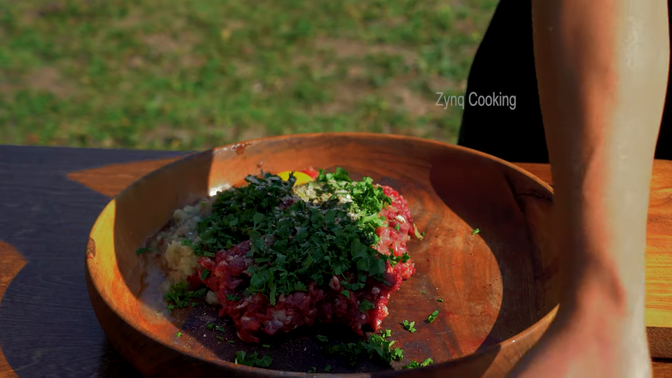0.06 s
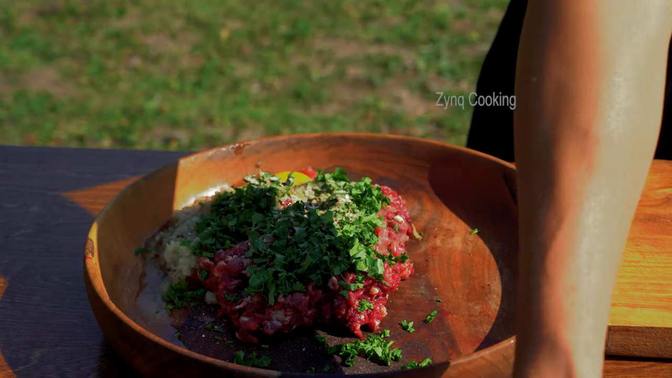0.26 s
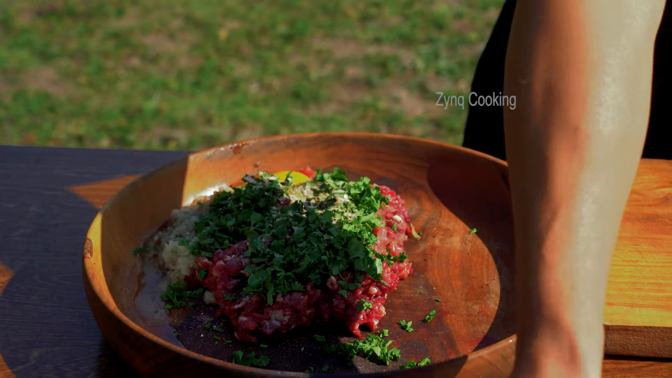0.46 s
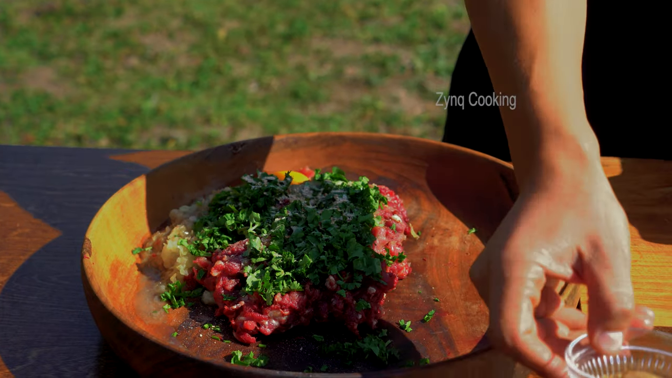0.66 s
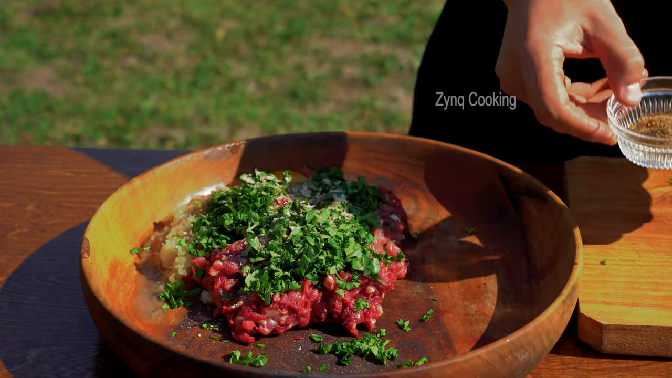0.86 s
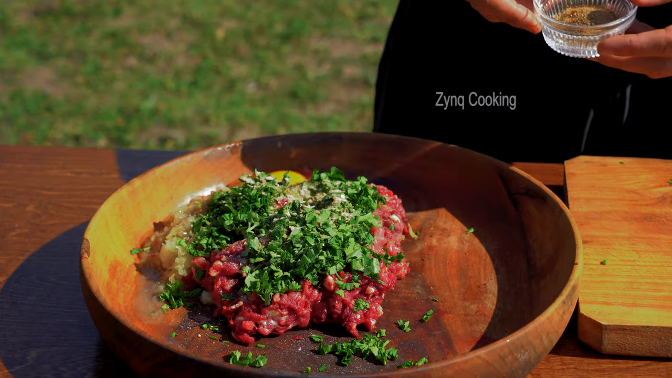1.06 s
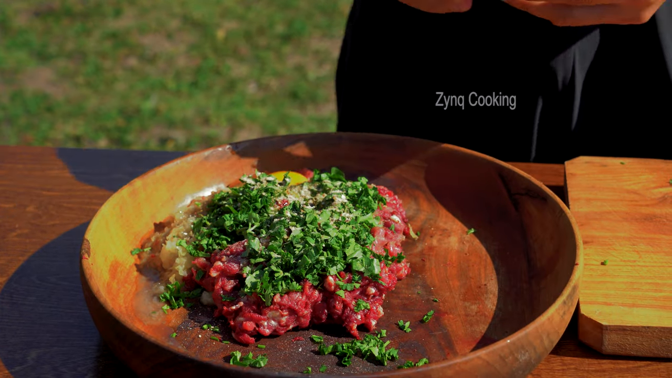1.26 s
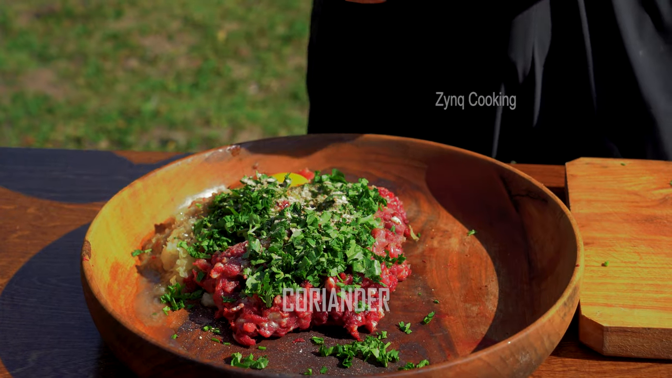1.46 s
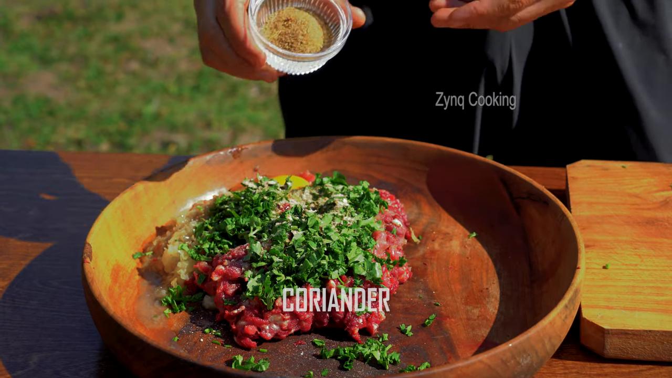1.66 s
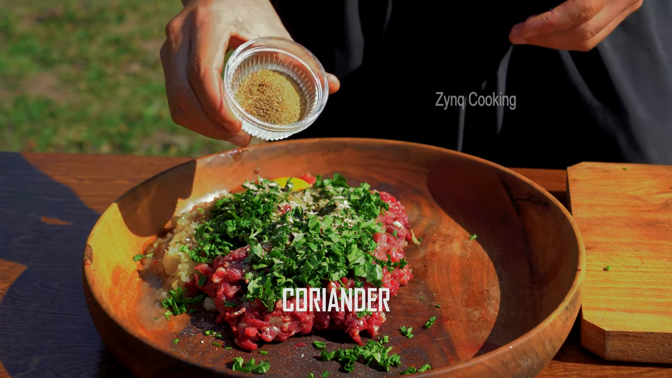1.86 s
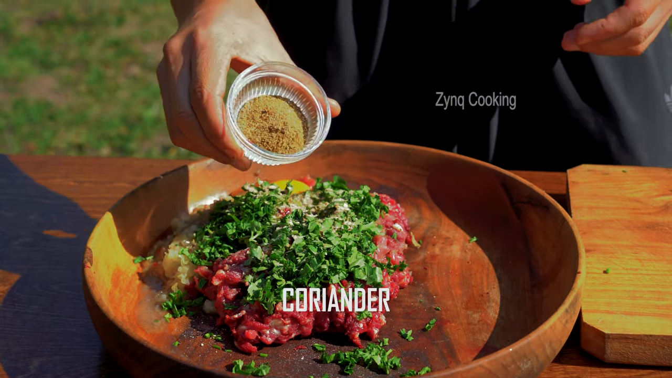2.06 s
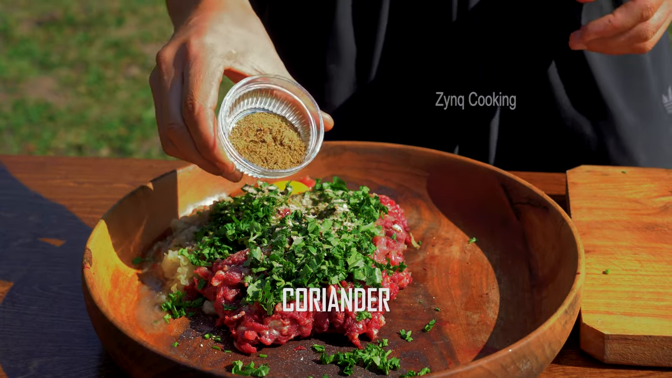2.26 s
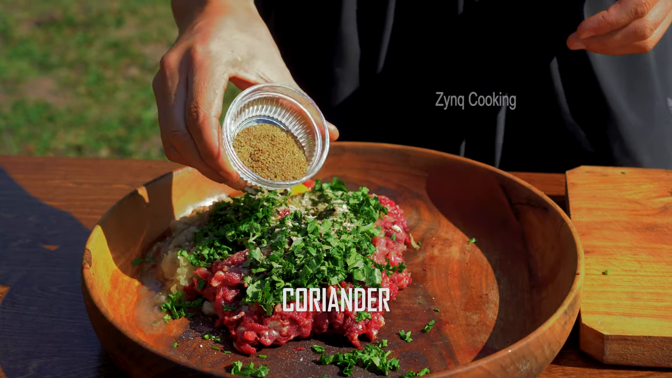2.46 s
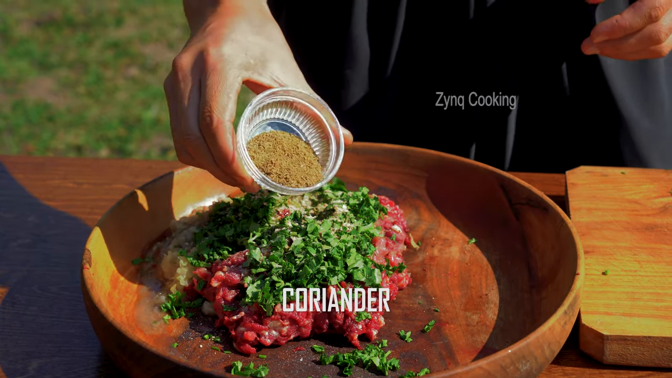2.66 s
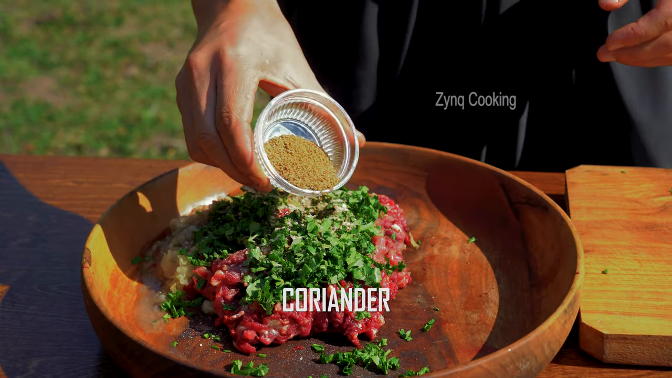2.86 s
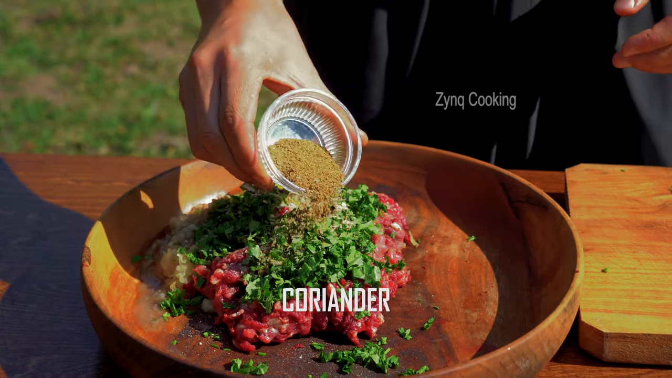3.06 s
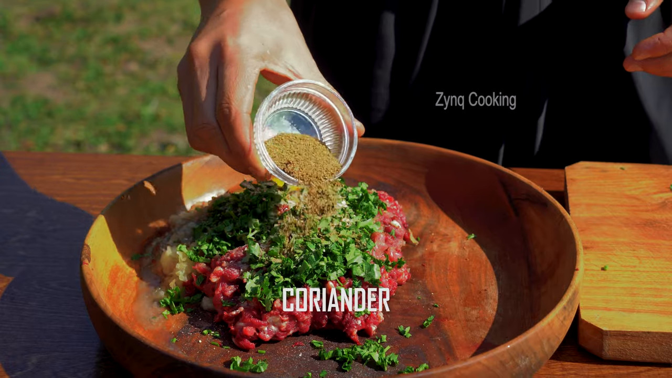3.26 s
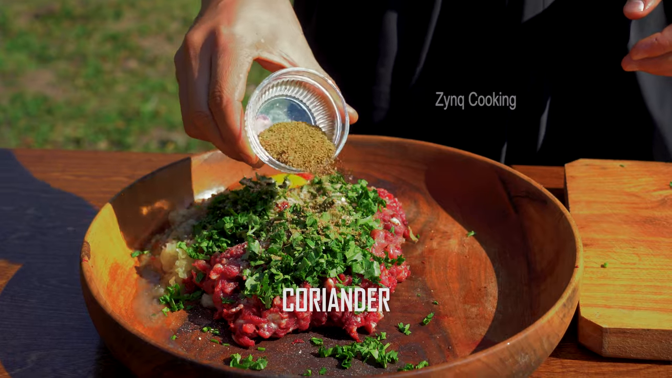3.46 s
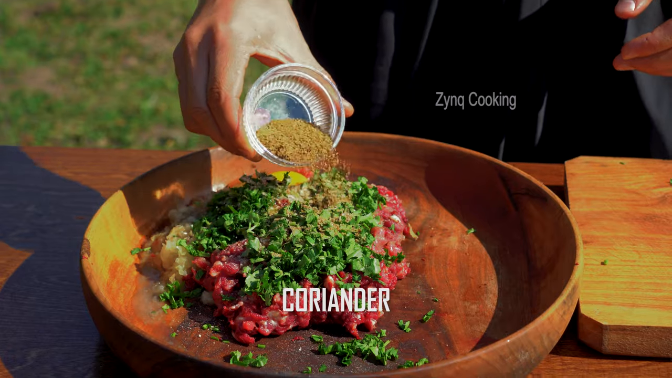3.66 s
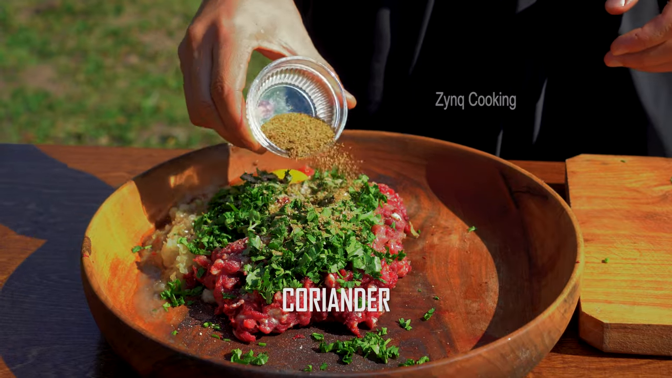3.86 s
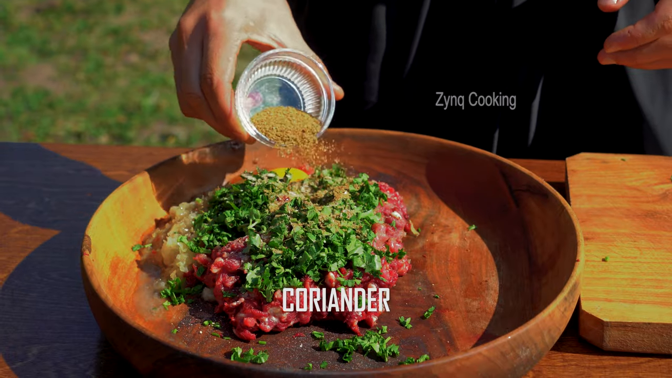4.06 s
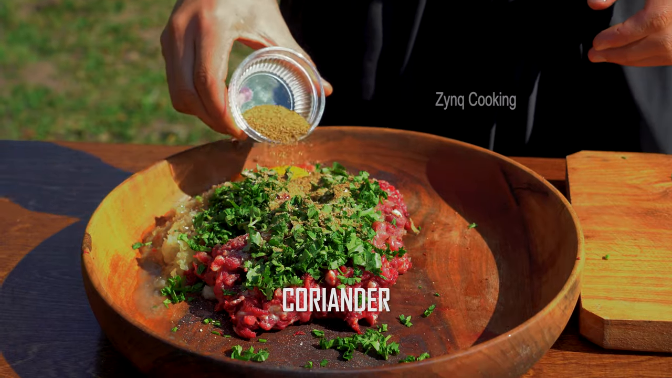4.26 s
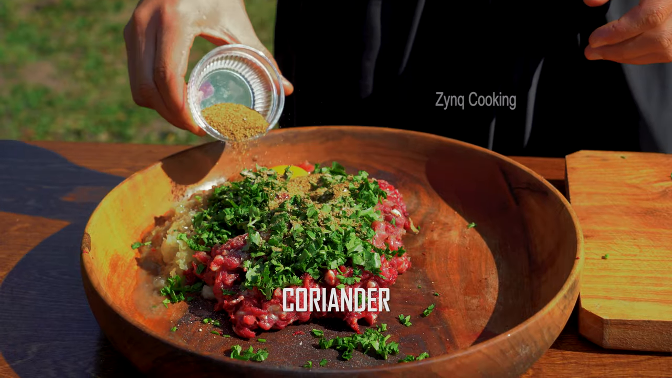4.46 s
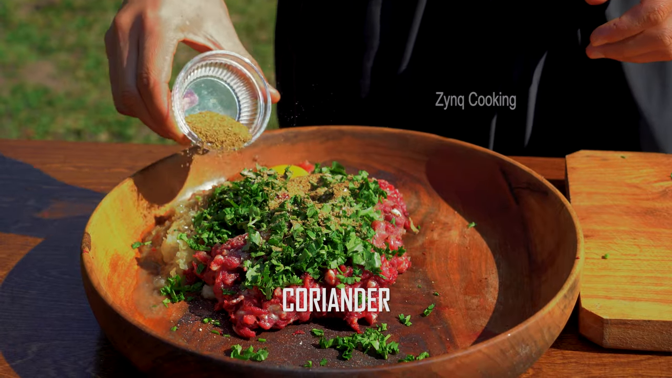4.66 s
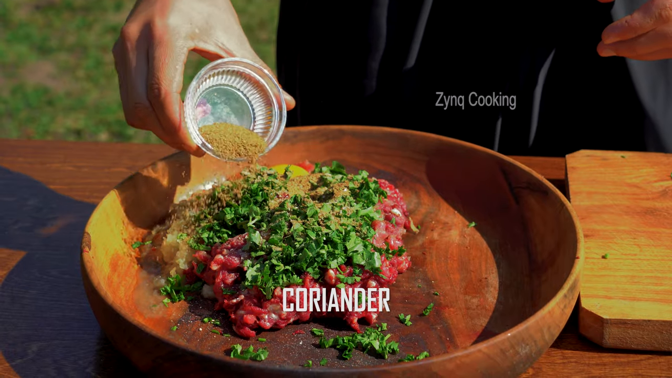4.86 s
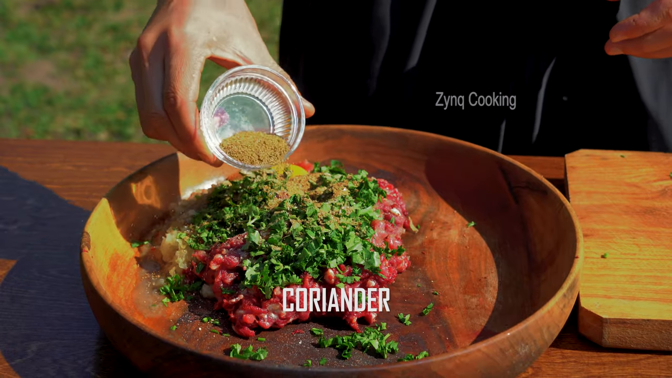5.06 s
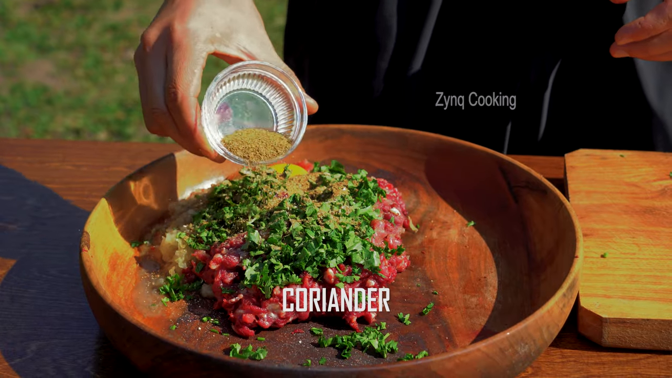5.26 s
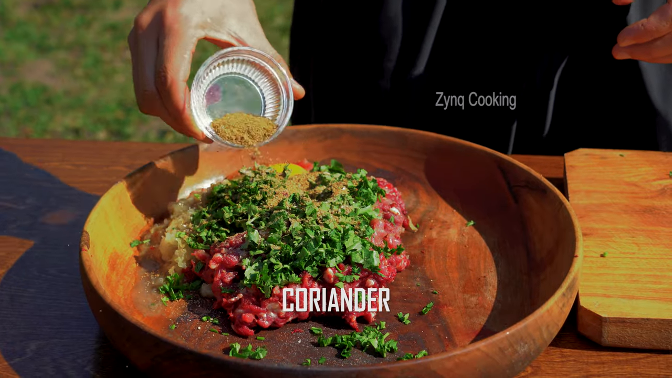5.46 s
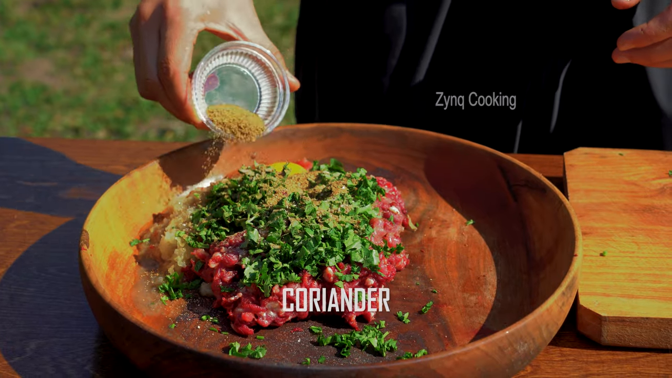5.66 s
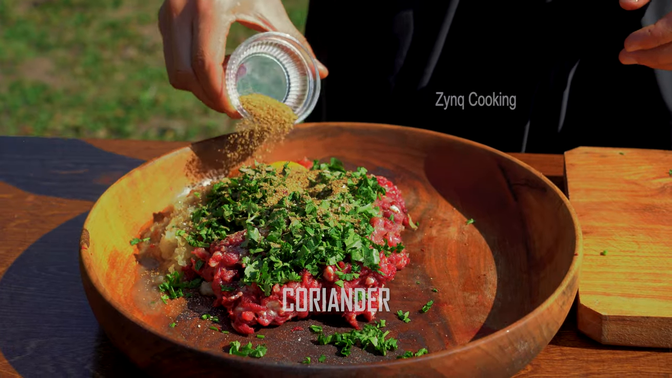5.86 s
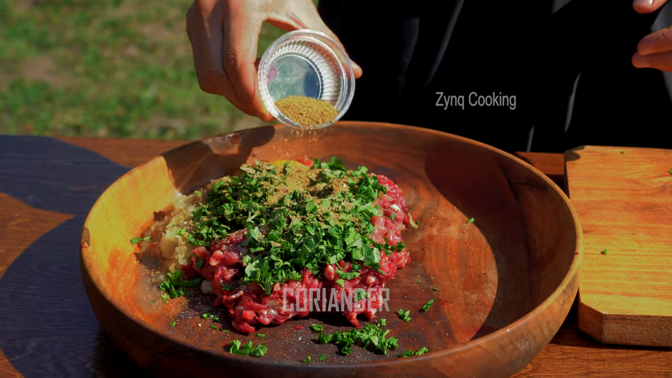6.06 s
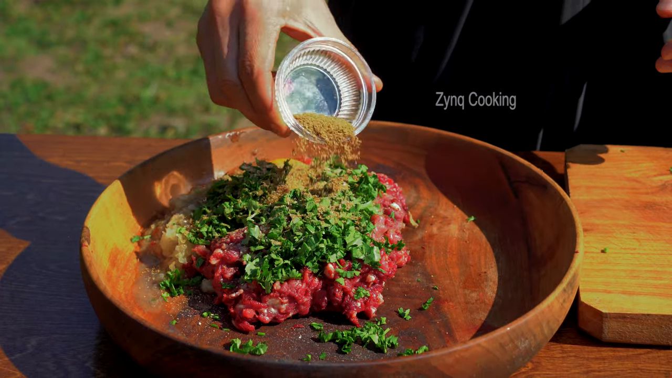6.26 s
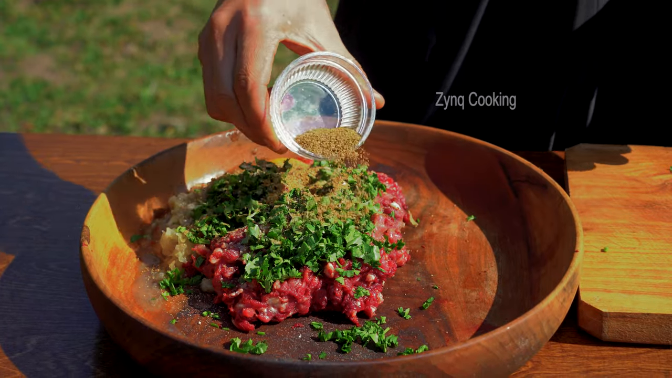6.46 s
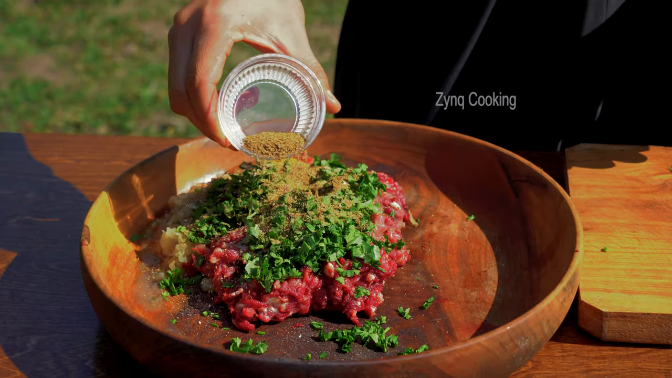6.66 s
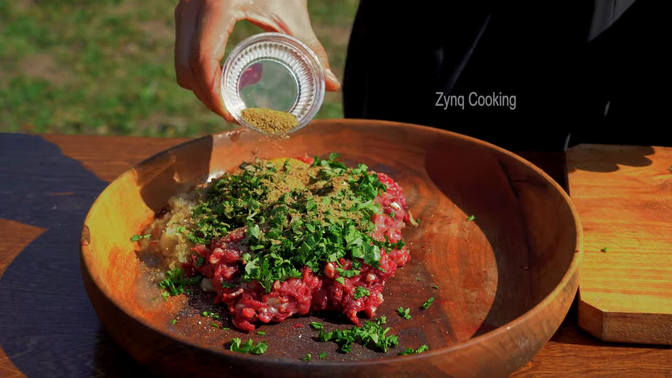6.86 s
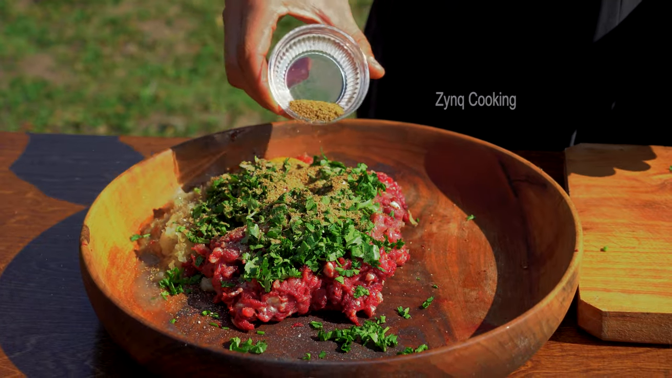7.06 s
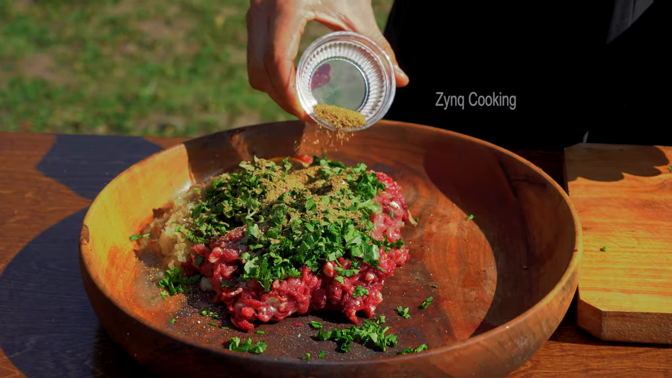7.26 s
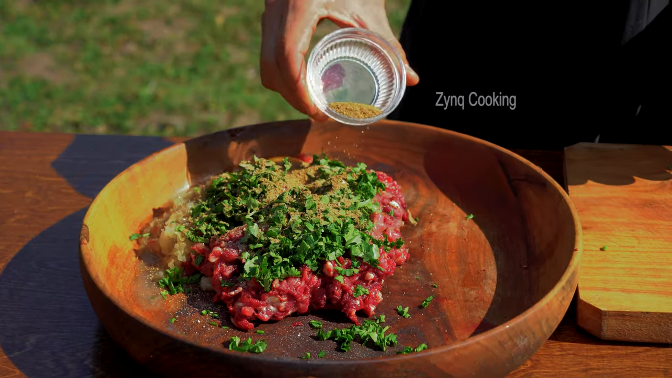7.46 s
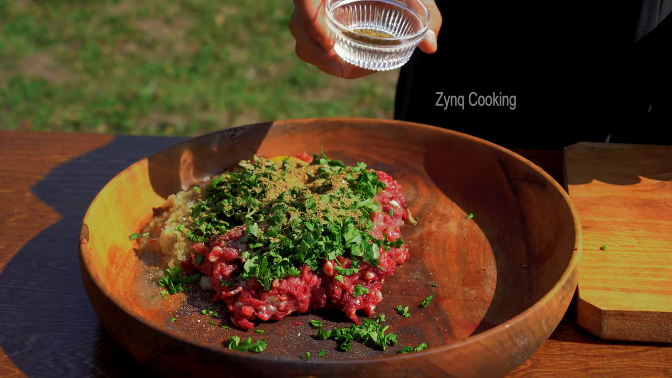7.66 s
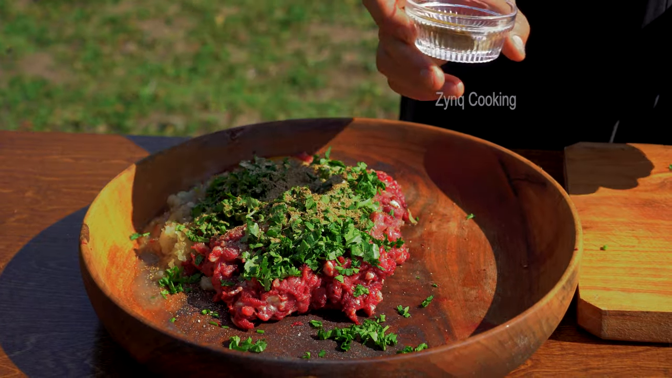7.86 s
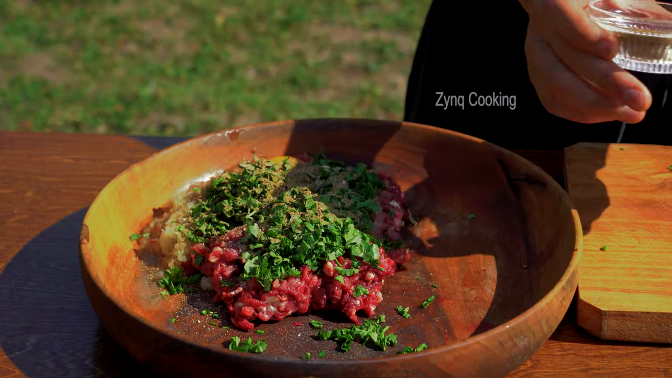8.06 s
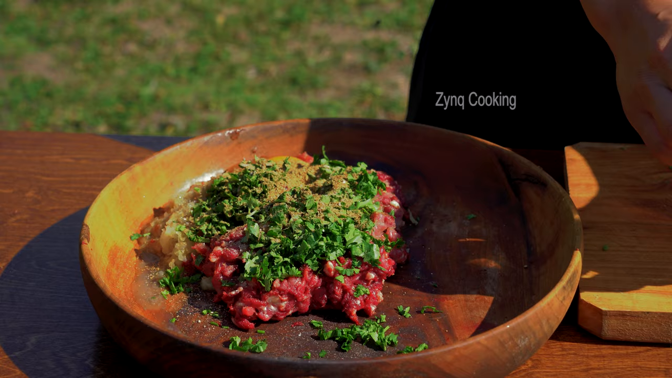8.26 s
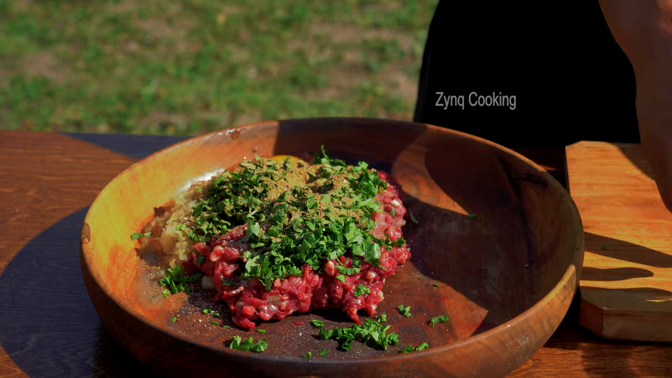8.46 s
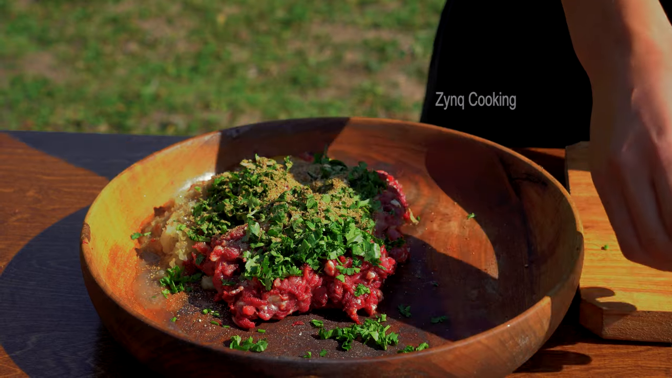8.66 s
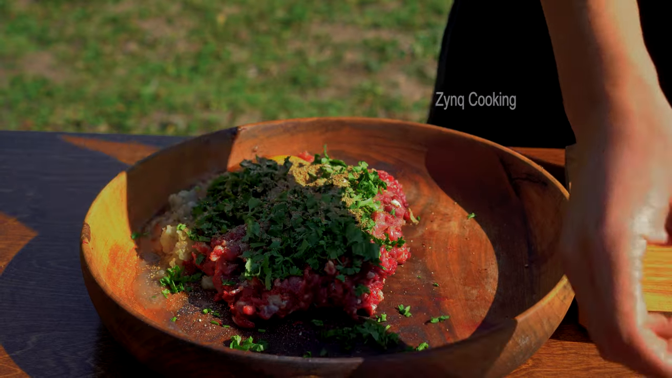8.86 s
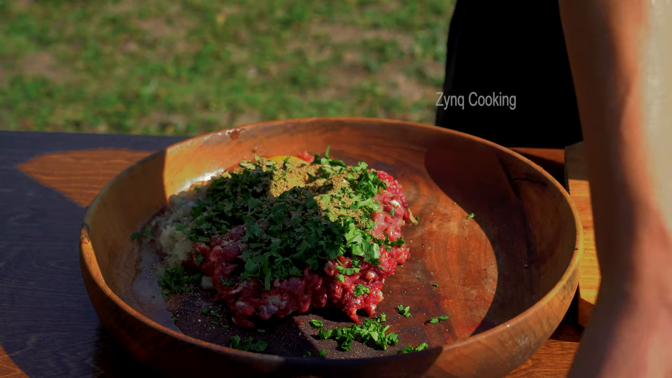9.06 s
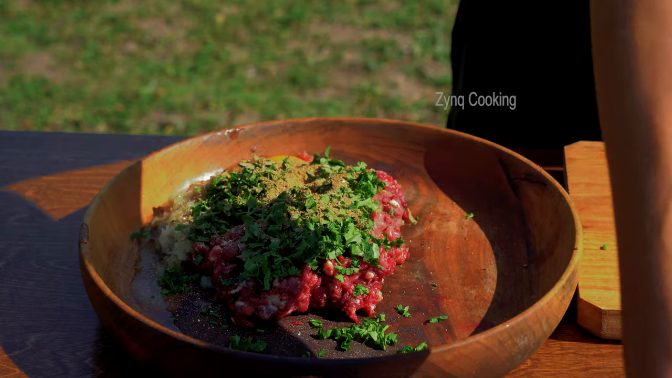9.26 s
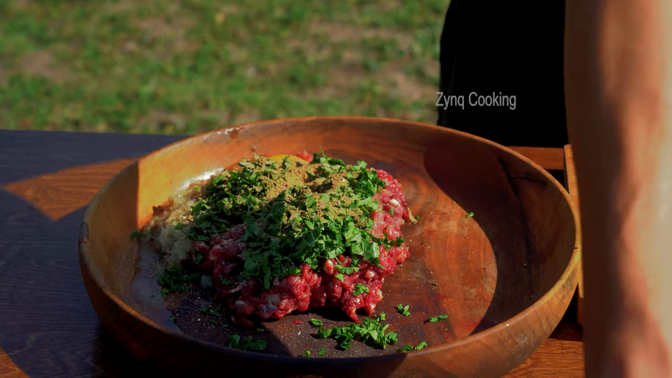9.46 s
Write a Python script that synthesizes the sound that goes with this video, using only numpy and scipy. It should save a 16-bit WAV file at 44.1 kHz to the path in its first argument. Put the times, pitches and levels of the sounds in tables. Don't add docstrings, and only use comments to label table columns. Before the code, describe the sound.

Soft open-air wash with sparse dry ticks from shaken spice, low wind buffeting, and finally a glass bowl knocked down and dragged on wooden planks.

```python
import sys
import numpy as np
from scipy import signal
from scipy.fft import rfft, irfft
from scipy.io import wavfile
from scipy.ndimage import uniform_filter1d

SR = 44100
rng = np.random.default_rng(int(sys.argv[2]) if len(sys.argv) > 2 else 0)


def makeup_ratio(level_db):
    decades = np.asarray(level_db, float) / 20
    return 10 ** decades


def dump(signal):
    limited = np.clip(np.atleast_2d(signal).T, -1, 1)
    pcm = np.round(limited * 32767).astype(np.int16)
    wavfile.write(sys.argv[1], SR, pcm)


N = 418950


def evened(x):
    return x / np.sqrt(np.mean(x ** 2) + 1e-20)


def steadied(x, size):
    power = abs(uniform_filter1d(x ** 2, size))
    return evened(x / np.sqrt(power + 0.075 * np.mean(x ** 2)))


def add(mix, s, sound):
    part = mix[round(s * SR):][:len(sound)]
    part += sound[:len(part)]


def coloured(x, points):
    point_hz, db = np.transpose(points)
    hz = np.fft.rfftfreq(x.shape[-1], 1 / SR)
    gain = makeup_ratio(np.interp(np.log(hz + 1), np.log(point_hz + 1), db))
    return evened(irfft(rfft(x) * gain, x.shape[-1]))


def band(x, lo_hz, hi_hz, order=2):
    sos = signal.butter(order, [lo_hz, min(hi_hz, .49 * SR)], "band", fs=SR, output="sos")
    return signal.sosfilt(sos, x)


def notch(x, hz, width_hz):
    return signal.lfilter(*signal.iirnotch(hz, hz / width_hz, SR), x)


def ring(modes, t, tilt_db=0, phases=0):
    hz, db, t60 = np.transpose(modes)[:, :, None]
    db = db + tilt_db * np.log2(np.maximum(hz / 1000, 1))
    return (makeup_ratio(db - 60 * t / t60) * np.sin(2 * np.pi * hz * t + phases)).sum(0)


# frequency in Hz, density in dB per Hz.
WASH_COLOUR = [(7, -23.5), (12, 12), (22, -5), (37, -6.5), (70, -12), (110, -8.5), (300, -11), (600, -11.5),
               (1100, -12), (2100, -19.5), (3400, -25), (4500, -33), (7000, -48), (16000, -55.5)]
# time in seconds, level in dB.
WASH_SWELL = [(0.0, -1.5), (9.5, -1)]
WASH_DB, PATCHY_DB = -54.5, .6


def wash():
    frames = N // 256 + 5
    a, b, patches = rng.standard_normal((frames, 513, 3)).T
    patches = uniform_filter1d(uniform_filter1d(patches, 12, 0), 14, 1)
    spectrum = (a + 1j * b) * makeup_ratio(PATCHY_DB * evened(patches))
    noise = signal.istft(spectrum, nperseg=1024, noverlap=768)[1][:N]
    swell_db = np.interp(np.arange(N) / SR, *np.transpose(WASH_SWELL))
    return makeup_ratio(WASH_DB + swell_db) * coloured(noise, WASH_COLOUR)


# frequency in Hz, level in dB, t60 in seconds.
TABLE_MODES = [(172.5, -1.5, 0.23), (250, -9, 0.27), (375.8, -6, 0.22), (436, 0, 0.11), (483, -6.5, 0.13),
               (619, 0, 0.045), (707, 3, 0.033), (811, -2.5, 0.075), (936, 4, 0.029), (1102, 0, 0.031),
               (1246, -13.5, 0.022), (1603, 4, 0.016), (1890, 1.5, 0.041), (2000, -4, 0.026),
               (2230, 5, 0.017), (2620, 8, 0.0091), (3230, 7, .02), (4430, -30, 0.0197)]
# frequency in Hz, density in dB per Hz.
PLANK_GRAIN = [(90, -40), (170, 11.5), (420, 9.5), (1000, -2), (1400, -9), (2500, -33), (5000, -37),
               (9000, -62), (16000, -90)]


def wood(t, draws, tilt_db, grain_db):
    share, noise = draws[:len(TABLE_MODES)], draws[-len(t):]
    modes = [(hz, db + 3.1 * abs(k), t60) for (hz, db, t60), k in zip(TABLE_MODES, share)]
    build_up = 1 - np.exp(-t / 0.0038)
    grain = coloured(noise, PLANK_GRAIN) * makeup_ratio(grain_db - 60 * t / 0.094) * build_up
    return ring(modes, t, tilt_db=tilt_db) + grain


# start in seconds, blow in dB, contact in ms,
# grit in dB re the blow, lowest frequency stirred in Hz.
FOOT_KNOCKS = [
    (0.394, -35.5, 0.83, -40, 90),
    (0.4645, -33.5, 1.73, -40, 300),
    (8.805, -8, 0.7, -6.5, 520),
    (8.821, -33, 0.24, 9.5, 300),
    (8.831, -29, 1.1, -29.5, 300),
    (8.836, -32, 0.9, 3, 300),
    (8.857, -5, 1, -21, 120),
    (8.875, -18.5, 1.14, -17, 120),
]


def knocks():
    out, t = np.zeros(N), np.arange(SR // 4) / SR
    draws = rng.standard_normal((len(FOOT_KNOCKS), len(t) + 100))
    for (s, db, ms, grit_db, low_hz), each in zip(FOOT_KNOCKS, draws):
        push = np.diff(signal.windows.hann(int(ms * SR / 1000) + 3))
        answer = np.convolve(wood(t, each, -1.1, 8.5), push)[:len(t)]
        thud = band(answer, low_hz, 12000, order=1)
        grit = band(each[:len(t)], 1680, 3900) * makeup_ratio(grit_db - 60 * t / 0.0236)
        add(out, s, makeup_ratio(db) * (thud / abs(thud).max() + grit))
    return out


# time of the top in seconds, level in dB, rise in seconds,
# brightness in dB, lowest frequency in Hz.
FOOT_DRAGS = [
    (.445, -42.5, .012, -12, 302),
    (.468, -39, 0.0094, -19, 318),
    (0.623, -51, .0015, -25, 200),
    (8.955, -39.5, 0.0092, -26, 250),
    (8.971, -19.5, 0.0059, -2, 150),
    (9.007, -18, 0.0033, -10, 342),
    (9.035, -25.5, .005, -22, 340),
    (9.044, -33.5, .003, -25, 327),
    (9.083, -58, .01, -14, 200),
]
LET_GO_T60 = 0.029


def drags():
    out, t = np.zeros(N), np.arange(SR // 5) / SR
    draws = rng.standard_normal((len(FOOT_DRAGS), 3, len(t)))
    for (s, db, rise, bright_db, low_hz), (a, b, c) in zip(FOOT_DRAGS, draws):
        after = t - 3 * rise
        stroke = np.where(after < 0, np.exp(-(after / rise) ** 2), makeup_ratio(-60 * after / LET_GO_T60))
        slips = band(a * (abs(b) > 1.5) * stroke, low_hz, 3900)
        answer = wood(t, c, bright_db - 9.0, 4.5) * makeup_ratio(-120 * t)
        rub = signal.fftconvolve(slips, answer)[:len(t)]
        rub = notch(band(rub, 0.87 * low_hz, 9000), 570, 160)
        add(out, s - 3 * rise, makeup_ratio(db) * 1.65 * rub / abs(rub).max())
    return out


# low edge in Hz, high edge in Hz, level in dB, sign so that neighbours add.
CRACK_BANDS = [(1600, 3600, 4, -1), (4500, 6000, 0, 1), (6700, 9200, 3.5, -1), (10000, 14800, 11, 1)]
# frequency in Hz, width in Hz.
CRACK_DIPS = [(4000, 200), (9700, 700)]


def tick(db, body_db, edge_db, air_db, echo_db, noise):
    t = np.arange(len(noise)) / SR
    click = (t == 0) + .12 * noise * makeup_ratio(-60 * t / .003)
    crack = np.zeros(len(t))
    for share_db, (lo, hi, lift_db, sign) in zip((body_db, 0, edge_db, air_db), CRACK_BANDS):
        rung = band(click, lo, hi)
        crack += sign * makeup_ratio(share_db + lift_db) * rung / abs(rung).max()
    for hz, width_hz in CRACK_DIPS:
        crack = notch(crack, hz, width_hz)
    crack += makeup_ratio(body_db - 8.5) * ring([(525, 0.036, 0.0037), (960, 0.013, 0.0049)], t)
    scatter = noise[::-1] * (t > .0012) * makeup_ratio(-22 - 60 * np.maximum(t - .0065, 0) / .014)
    scatter[round(.0042 * SR)] += 1
    echo = signal.fftconvolve(crack, scatter)[:len(t)]
    return makeup_ratio(db) * (crack + makeup_ratio(echo_db) * echo)


# time in seconds, peak in dB at 3.5-6.5 kHz, then in dB re that peak
# the body at 1-3.5 kHz, edge at 6.5-10 kHz and air at 10-15 kHz.
DRY_TICKS = [(0.4616, -44.5, 3.5, -1, -17), (0.62, -42.5, 3.5, 1, -9), (1.2133, -58.5, -1, 3, 0),
             (1.6359, -35.5, -8, 3, -6), (1.6533, -38, -9, -9, -7), (2.2644, -59.5, -5, 0, -3),
             (2.6616, -25.5, 1.5, -9, -16), (2.9016, -44.5, -23, -34, -31), (2.99, -34, -4, -8, -16),
             (3.099, -47, -5, -1, -18), (3.212, -30, 5, 2.5, -9), (3.312, -22, -2.5, -2, -12),
             (3.7145, -43.5, -15, -14, -25), (4.0885, -55, 8.5, -8, -14), (5.4592, -50.5, 4, -1, -7),
             (5.5533, -43.5, 2, -2, -14), (5.676, -44, -26, -3, -25), (6.336, -57.5, 8, 8, 0),
             (6.382, -34.5, -3, 5.5, -11), (6.8007, -32.5, -11.5, -6, -9), (7.1906, -55, -11, -21, -22),
             (8.1706, -60, 12, 13, 0), (8.934, -27.5, -3.5, -0.5, -4), (8.9602, -39, -1, 4, -9)]
# time in seconds, peak in dB.
MORE_TICKS = [(3.3784, -58), (3.3976, -58), (3.5484, -64), (3.7505, -54), (4.1214, -64), (4.7864, -65),
              (4.8217, -61), (5.0015, -65), (5.0434, -63), (5.2574, -62), (5.3926, -62), (5.7486, -60),
              (5.9124, -64), (5.9224, -62), (8.2362, -58)]
# body, edge and air in dB re the peak.
SPECK_COLOUR = (-1, -5, -14)
ECHO_DB = -16.5


def ticks():
    rows = list(DRY_TICKS) + [(*row, *SPECK_COLOUR) for row in MORE_TICKS]
    out, noise = np.zeros(N), rng.standard_normal((len(rows), 1400))
    for (s, *row), each in zip(rows, noise):
        add(out, s + 0.00133, tick(*row, ECHO_DB, each))
    return out


# time when full in seconds, hold in seconds, level in dB,
# sharpness of the edges in dB re the eddies.
GUST_EDDIES = [(4.858, 0.047, -48.5, -11.5), (5.056, 0.067, -52, -15), (5.154, .015, -36.5, -9),
               (5.308, .08, -59.5, -5.5), (5.52, .03, -57.5, -10), (5.716, .02, -57, -19),
               (6.17, 0.045, -52, -14), (6.523, 0.13, -58, -16), (6.867, 0.008, -39.5, -23),
               (7.178, 0.015, -40.5, -17), (7.26, .12, -55, -10), (7.57, 0.063, -37, -9.5),
               (7.676, .12, -44.5, -17), (8.173, .04, -39.5, -13), (8.232, 0.15, -35.5, -5),
               (8.412, 0.065, -30, -8.5), (8.526, 0.037, -31, -8), (8.636, 0.06, -45, -12),
               (8.802, 0.0087, -35, -25), (8.884, 0.047, -38, -22), (9.003, 0.07, -53, 2.5),
               (9.31, .06, -57, -10), (9.425, 0.033, -31.5, -13.5)]
GUST_RISE_DB_PER_S, GUST_FALL_DB_PER_S = 500., 303.5


def gusts(t):
    s, hold, db, sharp_db = np.transpose(GUST_EDDIES)[:, :, None]
    early, late = np.maximum(s - t, 0), np.maximum(t - s - hold, 0)
    eddies = makeup_ratio(db - GUST_RISE_DB_PER_S * early - GUST_FALL_DB_PER_S * late)
    return np.linalg.norm(eddies, axis=0), np.linalg.norm(eddies * makeup_ratio(sharp_db), axis=0)


# time in seconds, level in dB.
BREEZE_PUSH = [(4.2, -89), (4.85, -57), (5.1, -55), (5.25, -40), (5.45, -52.5), (5.53, -43), (5.75, -48),
               (5.95, -55), (6.8, -52.5), (7.15, -45.5), (7.4, -38.5), (7.55, -47.5), (8.13, -48),
               (8.3, -41), (8.7, -37.5), (9.15, -50), (9.4, -37.5), (9.5, -47)]


def wind():
    t, coarse = np.arange(N) / SR, np.arange(0, N, 64) / SR
    push = makeup_ratio(np.interp(t, *np.transpose(BREEZE_PUSH)))
    lump, edge = (np.interp(t, coarse, level) for level in gusts(coarse))
    shoves = rng.standard_normal(N) * (rng.random(N) < 160. / SR)
    slow = steadied(band(rng.standard_normal(N), 4.07, 14.7), size=8000)
    lumps = coloured(shoves, [(8, -49), (26, 15.5), (80, 3.0), (150, -72), (600, -130)])
    edges = coloured(shoves, [(30, -81), (95, 8.5), (200, -7.5), (400, -25.5), (1500, -130)])
    return push * slow + lump * steadied(lumps, size=3000) + edge * steadied(edges, size=2500)


# time in seconds, peak in dB, width in ms.
HARD_FLAPS = [(5.136, -35, 8.7), (5.164, -40, 7.4), (6.865, -58, 5.3), (7.575, -45, 7.8), (7.609, -57, 9.8),
              (8.176, -38.5, 6.2), (8.225, -33, 4.2), (8.273, -31.5, 4.6), (8.309, -31.5, 4.8),
              (8.384, -36, 3.8), (8.423, -24.5, 6.7), (8.46, -26.5, 4.8), (8.544, -29, 7.7)]


def flaps():
    out = np.zeros(N)
    for (s, db, ms), sign in zip(HARD_FLAPS, rng.choice([-1, 1], len(HARD_FLAPS))):
        u = np.arange(-4, 4, 4000 / (ms * SR))
        add(out, s, sign * makeup_ratio(db) * (1 - u ** 2) * np.exp(-u ** 2 / 2))
    return out


# start in seconds, length in seconds, level in dB.
INSECT_PHRASES = [
    (7.46, .24, -90),
    (7.94, 0.33, -88),
    (8.3, 0.46, -91),
]
SCRAPES_PER_S, SCRAPE_SHARPNESS, SCRAPE_SPREAD_DB = 16.4, 6., 5.


def insect():
    out = np.zeros(N)
    for s, length, db in INSECT_PHRASES:
        turns = np.arange(0, length, 1 / SR) * SCRAPES_PER_S
        strength = makeup_ratio(SCRAPE_SPREAD_DB * rng.standard_normal(20))[turns.astype(int)]
        throb = strength * abs(np.sin(np.pi * turns)) ** SCRAPE_SHARPNESS
        wing = band(rng.standard_normal(SR), 9100, 9650)[:len(turns)]
        add(out, s, makeup_ratio(db) * evened(throb * wing))
    return out


# frequency in Hz, level in dB, t60 in seconds.
GLASS_LOW_MODES = [(3614, -4.5, 0.16), (3600, 0.5, 0.22), (3675, -21.5, .2)]
# frequency in Hz, level in dB, t60 in seconds.
GLASS_HIGH_MODES = [(8040, -6.5, 0.062), (8200, -20.5, .08), (8145, -1.5, 0.048), (13600, -22.5, 0.086),
                    (13920, -25, .07)]
# low ring in dB, high ring in dB.
GLASS_CLINKS = [
    (-23.5, -18),
    (-38, -29.5),
    (-29, -38),
    (-38, -34),
    (-49, -72),
    (-50, -75),
]
GLASS_RISE_S = 0.0013


def clinks():
    out = np.zeros(N)
    starts = [row[0] for row in FOOT_KNOCKS[2:]]
    ends = starts[1:] + [starts[-1] + .2]
    for s, (low_db, high_db), end in zip(starts, GLASS_CLINKS, ends):
        t = np.arange(round((end - s) * SR) + 40) / SR
        glass = makeup_ratio(low_db) * ring(GLASS_LOW_MODES, t, phases=2 * np.pi * rng.random((3, 1)))
        glass += makeup_ratio(high_db) * ring(GLASS_HIGH_MODES, t, phases=2 * np.pi * rng.random((5, 1)))
        fade = np.minimum(t / GLASS_RISE_S, t[::-1] * SR / 40)
        add(out, s, glass * np.clip(fade, 0, 1))
    return out


def scene():
    air = wash() + wind() + flaps() + insect()
    bowl = knocks() + drags() + ticks() + clinks()
    return np.tile(air + bowl, (2, 1))


# frequency in Hz, density in dB per Hz.
HISS_COLOUR = [(30, 13), (300, 13.5), (1500, 0.95), (6000, 10), (16000, 6.4)]
HISS_DB, HISS_SHARED = -74.5, .15


def amplifier_hiss():
    hiss = makeup_ratio(HISS_DB) * coloured(rng.standard_normal((2, N)), HISS_COLOUR)
    return hiss + HISS_SHARED * hiss[::-1]


def band_limit(x):
    return signal.sosfilt(signal.butter(12, 16830, fs=SR, output="sos"), x)


def record(dry):
    low_pass = signal.firwin(401, 15780, fs=SR)[None]
    limited = signal.oaconvolve(dry + amplifier_hiss(), low_pass, "same")
    return band_limit(limited)


dry = scene()
out = record(dry)
dump(out)
```